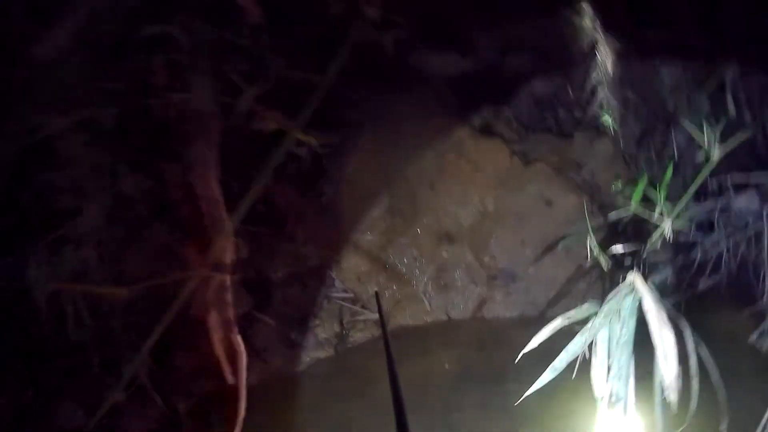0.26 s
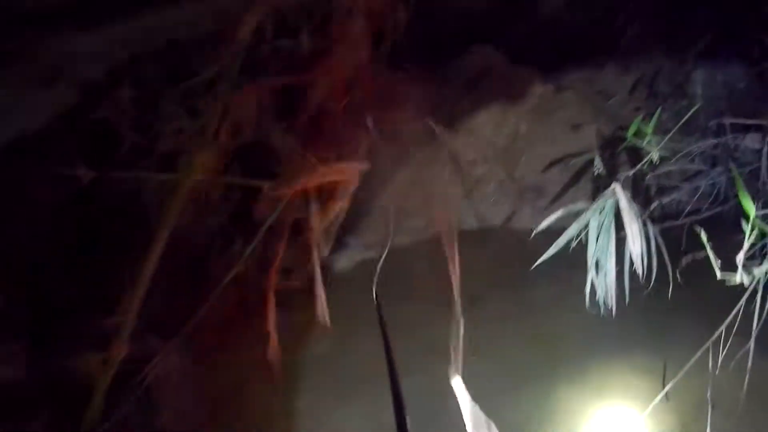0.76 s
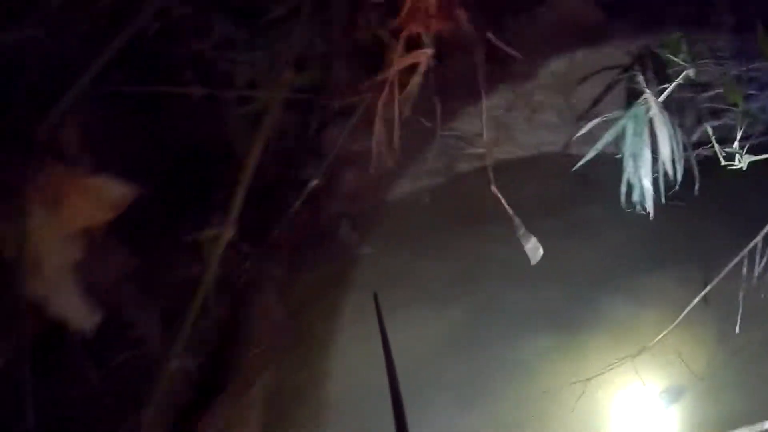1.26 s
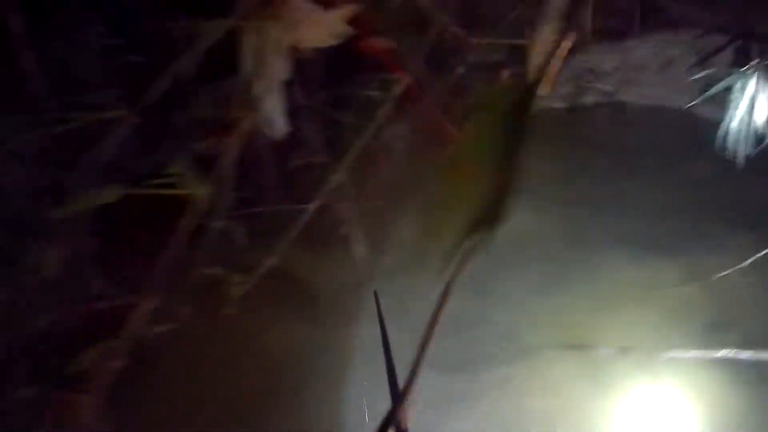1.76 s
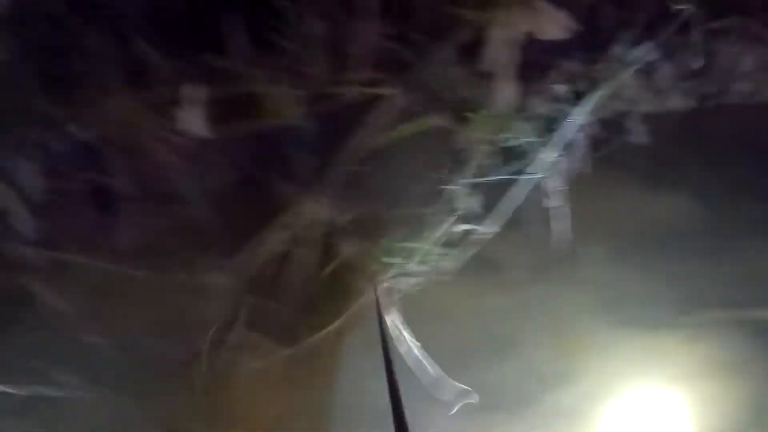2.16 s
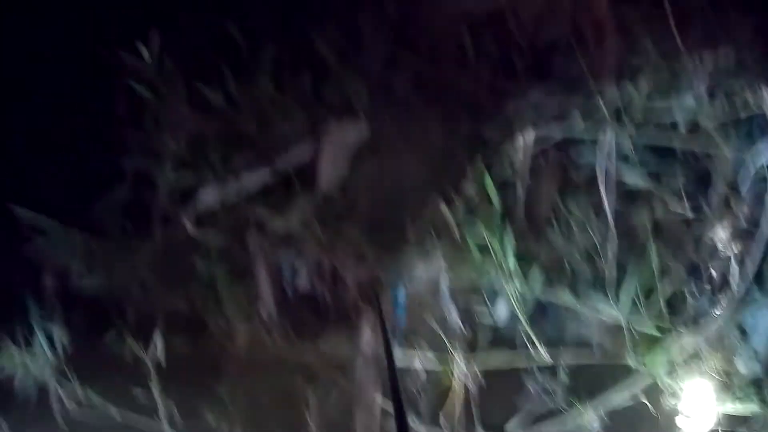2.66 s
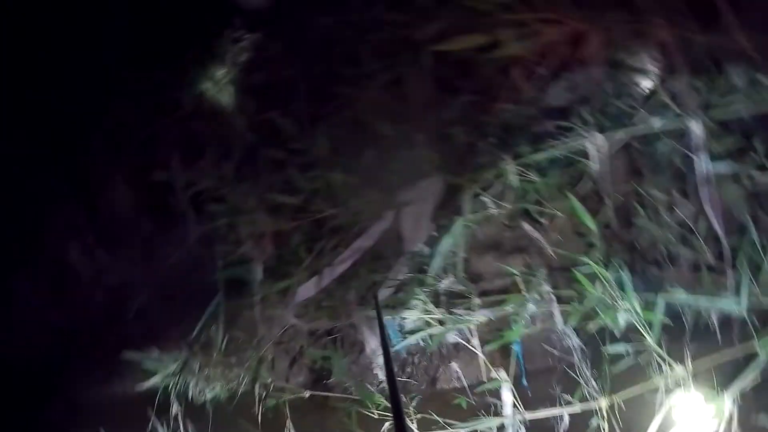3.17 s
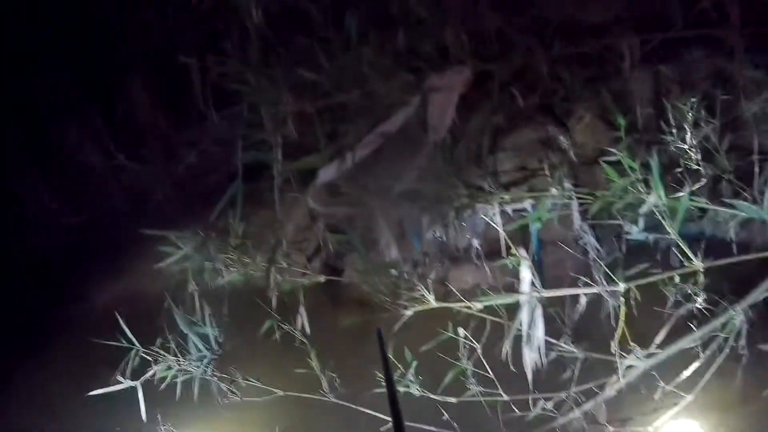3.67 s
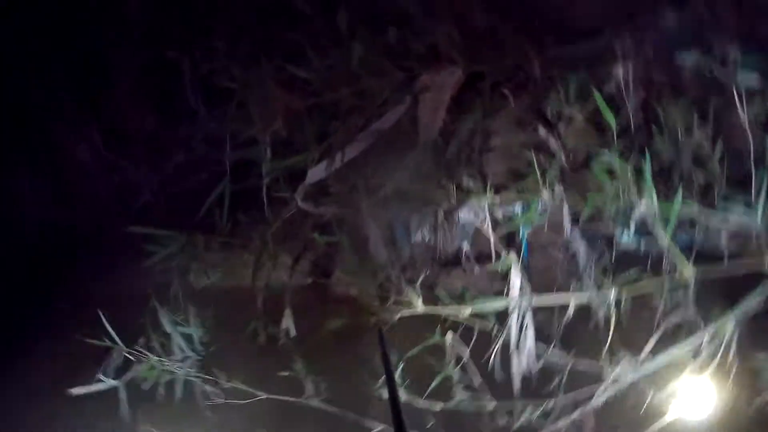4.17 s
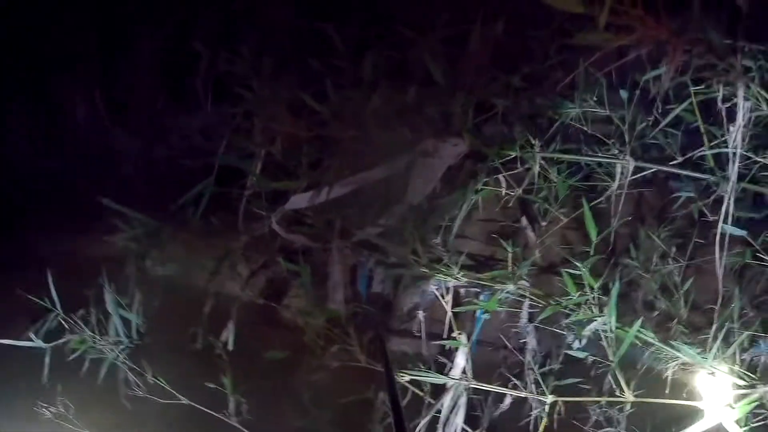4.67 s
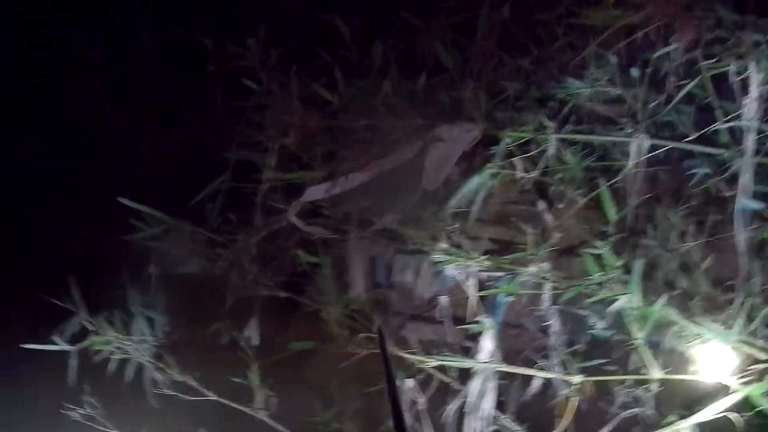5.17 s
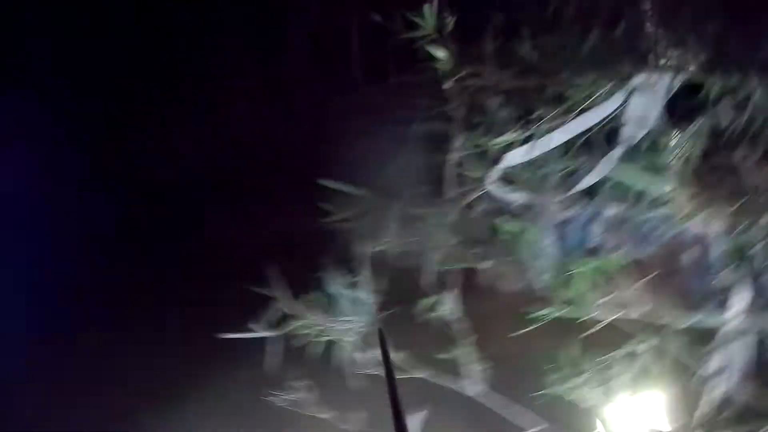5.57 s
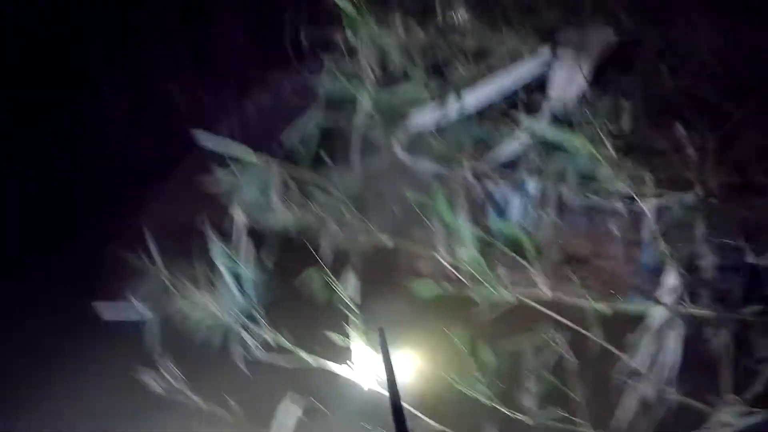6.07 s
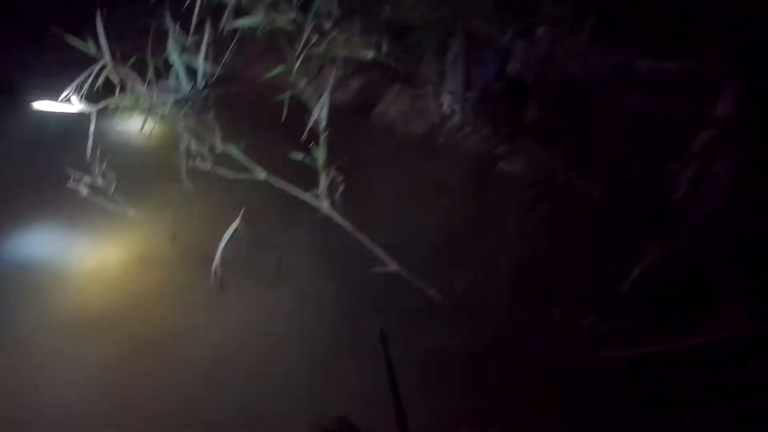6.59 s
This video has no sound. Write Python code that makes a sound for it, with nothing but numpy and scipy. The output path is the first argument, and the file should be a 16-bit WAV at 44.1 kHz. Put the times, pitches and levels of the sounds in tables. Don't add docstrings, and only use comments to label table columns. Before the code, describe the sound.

Someone wades along an overgrown bank, stems scraping and twigs snapping and thudding on a hard hollow shell, with water plops and faint insects.

```python
import sys
import numpy as np
from scipy import signal
from scipy.fft import rfft, irfft
from scipy.io import wavfile
from scipy.ndimage import uniform_filter1d

SR = 44100
rng = np.random.default_rng(int(sys.argv[2]) if len(sys.argv) > 2 else 0)


def int16_out(signal):
    q = np.round(np.clip(np.atleast_2d(signal).T, -1, 1) * 32767)
    wavfile.write(sys.argv[1], SR, q.astype(np.int16))


def ratio(d):
    e = np.asarray(d, float) / 20
    return 10 ** e


N = 301350


def evened(x):
    return x / np.sqrt(np.mean(x ** 2) + 1e-20)


def curve(rows):
    t_s, value = np.transpose(rows)
    return np.interp(np.arange(N) / SR, t_s, value)


def add(mix, t_s, sound):
    part = mix[round(t_s * SR):][:len(sound)]
    part += sound[:len(part)]


def louder(*levels_db):
    return 10 * np.log10(sum(ratio(db) ** 2 for db in levels_db))


def strokes(start_s, length_s, level_db, in_db_s, out_db_s):
    t_s = np.arange(0, N / SR + .01, .002)[:, None]
    before_s = np.maximum(start_s - t_s, 0)
    after_s = np.maximum(t_s - start_s - length_s, 0)
    each_db = level_db - in_db_s * before_s - out_db_s * after_s
    total_db = 10 * np.log10((ratio(each_db) ** 2).sum(1) + 1e-12)
    return np.interp(np.arange(N) / SR, t_s[:, 0], total_db)


def flicker(seconds):
    size = max(int(seconds * SR), 1)
    return evened(uniform_filter1d(uniform_filter1d(rng.standard_normal(N), size), size))


def coloured(points):
    f_hz, db = np.transpose(points)
    hz = np.fft.rfftfreq(N, 1 / SR)
    shape = ratio(np.interp(np.log(hz + 1), np.log(f_hz), db))
    return evened(irfft(rfft(rng.standard_normal(N)) * shape, N))


def slips(per_s, spread_db, clump_db):
    clicks = (rng.random(N) < per_s / SR) * rng.standard_normal(N)
    clicks = clicks * ratio(spread_db * np.minimum(rng.exponential(1, N), 4))
    return clicks * ratio(clump_db * flicker(0.016))


def ring(x, modes):
    out = 0
    for k, (hz, width_hz, db) in enumerate(modes):
        peak = signal.iirpeak(hz, hz / width_hz, SR)
        out = out + (-1) ** k * ratio(db) * signal.lfilter(*peak, x)
    return out


def housing(x, modes, uneven_db):
    touched = [(hz, width_hz, db + u) for (hz, width_hz, db), u in zip(modes, uneven_db)]
    top_hz = min(0.94 * modes[-1][0], 12800)
    wall = signal.butter(4, top_hz, fs=SR, output="sos")
    return signal.sosfilt(wall, ring(x, touched))


def ping(db, hz, cycles, glide):
    turns = np.arange(8000) * hz / SR
    shape = (1 - np.exp(-turns / 0.46)) * np.exp(-turns / cycles)
    tone = np.sin(2 * np.pi * turns * (1 + glide * np.tanh(turns / 16.0)))
    return ratio(db) * shape / shape.max() * tone


# t/s, length/s, drag level/dB, shell ring above drag/dB
DRAG_STROKES = [(0.0, 0.51, -32.5, -12), (0.547, 0.07, -20.5, -24), (0.801, 0.011, -25, -34),
                (0.905, 0.1, -30, -1), (1.127, 0.052, -21, -4), (1.303, 0.11, -24, -6.5),
                (1.507, 0.1, -21, -14), (1.717, 0.072, -28.5, -7.5), (1.835, 0.19, -28.5, -18),
                (2.092, 0.049, -21, -23), (2.255, 0.11, -25, -9.5), (2.391, 0.11, -26.5, -15),
                (2.653, 0.059, -26.5, -10), (2.757, 0.053, -28.5, -7.5), (2.884, 0.12, -29, -10),
                (3.049, 0.15, -28.5, -6), (3.185, 0.39, -31.5, 1), (3.625, 0.089, -32, -1.5),
                (3.78, 0.007, -22.5, -9.5), (3.834, 0.063, -26.5, -10), (4.017, 0.071, -35.5, -8),
                (4.389, 0.11, -37, -20), (4.584, 0.057, -34.5, -13), (4.662, 0.043, -30.5, -16),
                (4.746, 0.055, -32, -15), (4.85, 0.19, -49, -3), (5.173, 0.071, -41.5, -17),
                (5.387, 0.13, -31, -30), (5.585, 0.029, -35.5, -4.5), (5.83, 0.091, -40.5, -37),
                (6.096, 0.089, -41.5, -4), (6.499, 0.028, -52, -12.5)]
# t/s, length/s, shell ring level/dB, crackle above ring/dB
LEAF_STROKES = [(0.597, 0.009, -12.5, -8), (1.162, 0.026, -19.5, -34), (1.315, 0.026, -23, -17),
                (1.582, 0.018, -15, -11), (1.841, 0.013, -19, -13), (1.968, 0.034, -23.5, -14.5),
                (2.237, 0.036, -28.5, -11), (2.396, 0.028, -24, -20), (3.11, 0.064, -40, 3),
                (3.224, 0.29, -29.5, -3), (4.654, 0.12, -44, -11), (6.34, 0.07, -42.5, -33),
                (5.46, 0.033, -36, -26)]
REST_DB = [-9, -26.5, -43.5]
# t/s, level/dB
WADING_EFFORT = [(0.0, -41.5), (.6, -38), (.72, -47), (1.44, -41.5), (2.4, -43), (3.0, -38), (4.2, -42),
                 (4.3, -66.5), (4.4, -38.5), (4.68, -40), (4.97, -52), (5.1, -39), (5.32, -48.5),
                 (5.6, -45), (5.76, -37.5), (6.05, -43.5), (6.18, -46), (6.83, -67)]


def contact():
    start_s, length_s, drag_db, ring_db = np.transpose(DRAG_STROKES)
    stem_drag, stem_ring = [strokes(start_s, length_s, db, in_db_s=906.5, out_db_s=325.5)
                            for db in (drag_db, drag_db + ring_db)]
    start_s, length_s, ring_db, crackle_db = np.transpose(LEAF_STROKES)
    leaf_ring, leaf_crackle = [strokes(start_s, length_s, db, in_db_s=1095.5, out_db_s=706)
                               for db in (ring_db, ring_db + crackle_db)]
    rest = [curve(WADING_EFFORT) + db for db in REST_DB]
    return (louder(stem_drag, rest[0]), louder(stem_ring, leaf_ring, rest[1]),
            louder(stem_ring - 12, leaf_crackle, rest[2]))


# f/Hz, width/Hz, level/dB
BODY_MODES = [(194, 82, 0), (293, 114, 0), (398, 60, 0.5), (693, 140, -9.5), (767, 120, -8),
              (1300, 170, -18)]
# f/Hz, width/Hz, level/dB
SHELL_MODES = [(1194, 180, 6), (1620, 74, 3.5), (1990, 270, 4), (2858, 246, 2.5), (3414, 190, -1)]
# f/Hz, width/Hz, level/dB
TICK_MODES = [(4122, 323, 10.5), (5560, 420, -6.5), (6300, 210, -11.5), (8800, 14000, -9.5),
              (9700, 3400, -7.5)]


def rubbing(drag_db, shell_db, crackle_db):
    clump = ratio(0.62 * flicker(0.0099))
    contact_db = [2.15 * flicker(0.037) for _ in BODY_MODES]
    coarse = clump * slips(per_s=1200, spread_db=1.5, clump_db=2.0)
    fine = clump * slips(per_s=5000, spread_db=2.5, clump_db=1.45)
    dry_leaves = clump * slips(per_s=250, spread_db=-1.0, clump_db=-1.0)
    body = evened(housing(coarse, BODY_MODES, contact_db))
    shell = evened(housing(fine + 0.17 * dry_leaves, SHELL_MODES, contact_db[::-1]))
    crackle = evened(housing(fine + 0.99 * dry_leaves, TICK_MODES, contact_db))
    return ratio(drag_db - 4.5) * body + ratio(shell_db - 13.5) * shell + ratio(crackle_db - 17.5) * crackle


# peak t/s, body level/dB, shell level/dB, tick level/dB, fall/ms
TWIG_SNAPS = [(0.126, -10.5, -7.5, -33, 1.6), (0.544, -30.5, -26, -60, 0.46),
              (0.817, -10.5, -13, -32.5, 2.1), (1.525, -35.5, 4, -4.5, 2.4), (1.607, -5.5, -8.5, -18, 7.4),
              (1.635, -45, -26.5, -19, 0.79), (1.689, -54, -23.5, -29.5, 1.9),
              (1.721, -13.5, -13, -33, 2.7), (1.987, -15.5, -33, -30, 0.98),
              (2.057, -22.5, -21.5, -55, 2.2), (2.109, -1, -6, -14, 3.7), (2.316, -8, -12, -23.5, 1.5),
              (2.413, -26, -15, -28.5, 1.5), (2.504, -11.5, -13.5, -26, 2.76), (2.516, -9.5, -27, -47, 4.7),
              (2.687, 1.5, -8.5, -37, 0.41), (3.05, -1, -16, -37, 0.55), (3.073, -16.5, -18.5, -30, 6),
              (3.667, -33, -20, -39, 2.5), (3.776, -8, -5.5, -18.5, 2.7), (3.804, -18, -22.5, -51.5, 1.6),
              (3.833, -6, -1, -14.5, 5.1), (4.14, -13.5, -24, -38, 8.6), (5.52, -24.5, -30, -44.5, 1.3)]
# peak t/s, body level/dB, shell level/dB
STEM_BUMPS = [(0.264, -19, -62), (0.395, -23, -51), (1.194, 1, -13), (1.326, -18.5, -48),
              (1.367, -11.5, -26), (1.889, -14.5, -15.5), (1.939, -24.5, -20.5), (2.015, -12.5, -21.5),
              (2.716, -18.5, -38), (2.814, -21.5, -48), (3.185, -22.5, -47), (3.552, -12.5, -23.5),
              (3.924, -23.5, -39.5), (4.433, -23.5, -40), (4.769, -22, -36), (4.85, -15.5, -43.5),
              (5.035, -28, -63), (2.147, -26, -39), (2.449, -33, -30.5), (3.77, -0.5, -14.5),
              (6.318, -39.5, -76), (0.767, -29.5, -32), (1.269, -27, -38), (6.127, -25, -71),
              (6.063, -31, -45.5), (6.635, -40, -49.5)]
# peak t/s, body level/dB, shell level/dB, rise/ms, fall/ms
SCUFF_BLOWS = [(0.228, -17.5, -28.5, 19, 2.6), (.326, -28.5, -38.5, 3.7, 37), (0.466, -15, -31, 5.3, 20),
               (0.592, -14.5, -13, 5.4, 6.3), (0.805, -5.5, -18, 6.7, 4.5), (1.127, -25, -38, 5.8, 10),
               (2.92, -19.5, -48.5, 7.1, 4.1), (3.237, -13, -27, 7.9, 33), (3.321, -11, -24, 25, 4.3),
               (3.445, -13.5, -20.5, 9.6, 1.3), (3.484, -16, -29, 2.7, 11), (3.618, -15, -31, 2.4, 4),
               (4.11, -20.5, -47.5, 31, 2.4), (4.157, -15.5, -34.5, 9.2, 0.37),
               (4.519, -25, -38.5, 16, 0.96), (5.215, -18.5, -68.5, 2.2, 8.3),
               (5.388, -21.5, -42, 0.92, 10), (5.457, -16.5, -45, 2.5, 8.4),
               (5.622, -12.5, -34.5, 5.1, 5.6), (5.863, -18.5, -38.5, 6.4, 5.5),
               (6.539, -36.5, -46, 14, 46)]


def blows():
    snaps = [(*row, 0.41 + 0.051 * fall_ms, fall_ms) for *row, fall_ms in TWIG_SNAPS]
    bumps = [(t_s, body, shell, shell - 19, 1, 4.07) for t_s, body, shell in STEM_BUMPS]
    scuffs = [(t_s, body, shell, shell - 16.5, *shape) for t_s, body, shell, *shape in SCUFF_BLOWS]
    return snaps + scuffs + bumps


LEAD = 2000
DULL_TILT, DULL_FROM_DB = 0.38, -18
# f/Hz, width/Hz, level/dB
THUD_MODES = [(258, 186, 1), (418.5, 136, 3.5), (625, 268, -2), (1225, 71, -10)]


def knock(body_db, shell_db, tick_db, rise_ms, fall_ms, rattle):
    ms = (np.arange(len(rattle)) - LEAD) / SR * 1000
    rise_db = 7.4 * ms / max(rise_ms, .2)
    fall_db = -11.0 * ms / max(fall_ms, .3)
    shape = ratio(np.where(ms < 0, rise_db, fall_db))
    push = -3.0 * np.exp(-(rise_ms + fall_ms) / 3.0 - (ms / 0.24) ** 2)
    tilt_db = DULL_TILT * min(shell_db - body_db - DULL_FROM_DB, 0)
    groups = (THUD_MODES, body_db, tilt_db), (SHELL_MODES, shell_db, 0), (TICK_MODES, tick_db, 0)
    out = 0
    for modes, level_db, step_db in groups:
        uneven_db = 1.1 * rattle[:len(modes)] + step_db * np.arange(len(modes))
        sound = housing(shape * rattle + push, modes, uneven_db)
        out = out + ratio(level_db - 1.5) * sound / abs(sound).max()
    return out * signal.windows.tukey(len(out), .3)


# f/Hz, width/Hz, level/dB
MOUNT_RINGS = [(210, 6.9, -15.5), (393, 19, -20.5)]


def knocking():
    out = np.zeros(N)
    for t_s, *row in blows():
        add(out, t_s - LEAD / SR, knock(*row, rng.standard_normal(5000)))
    return out + 4.3 * ring(out, MOUNT_RINGS)


# t/s, length/s, level/dB
MOUNT_JOLTS = [(0.21, 0.027, -33), (0.33, 0.0074, -35), (0.53, 0.067, -31.5), (0.614, 0.018, -27.5),
               (0.813, 0.024, -30), (0.957, 0.048, -26), (1.182, 0.034, -32), (1.317, 0.055, -33.5),
               (1.602, 0.047, -33.5), (1.74, 0.037, -33), (1.905, 0.0071, -32), (2.028, 0.038, -35.5),
               (2.128, 0.051, -35), (2.294, 0.32, -40), (2.496, 0.012, -30), (2.745, 0.11, -33.5),
               (3.06, 0.1, -31.5), (3.238, 0.011, -30), (3.32, 0.076, -31.5), (3.542, 0.016, -31),
               (3.63, 0.075, -35), (3.763, 0.011, -24.5), (3.921, 0.0065, -29), (4.148, 0.0035, -25),
               (4.702, 0.0071, -32), (4.883, 0.011, -40), (5.463, 0.0055, -19.5), (5.866, 0.0074, -34)]
# f/Hz, level/dB
SHAKE_SPECTRUM = [(15, 9.5), (30, 8.5), (50, 24), (110, 22.5), (160, 3.5), (250, -49.5)]
MOUNT_HZ, MOUNT_WIDTH_HZ = 77.2, 23.4


def mount():
    jolts_db = strokes(*np.transpose(MOUNT_JOLTS), in_db_s=606.5, out_db_s=347)
    sway_db = louder(curve(WADING_EFFORT), jolts_db)
    hz = MOUNT_HZ + 0.3233 * MOUNT_WIDTH_HZ * flicker(0.0279)
    swing = np.sqrt(2) * np.sin(2 * np.pi * np.cumsum(hz) / SR) * ratio(3.03 * flicker(0.025))
    return ratio(sway_db) * (swing + ratio(-1.5) * coloured(SHAKE_SPECTRUM))


# t/s,
# peak level/dB, f/Hz, decay/cycles
PART_RINGS = [(.802, -15, 342, 4.6), (.815, -14, 2450, 4.7), (0.464, -25, 1183, 7.9), (0.328, -26, 1110, 3),
              (1.605, -9.5, 800, 4.2), (2.108, -10.5, 3100, 3.6), (2.389, -28, 2200, 3.2),
              (3.768, -10, 374, 1.9), (3.833, -5, 379, 1.9), (4.15, -26.5, 2520, 5),
              (4.788, -28.5, 228, 1.9), (4.975, -39, 292, 5.5), (4.147, -12.5, 76, 1.5),
              (5.512, -10.5, 74.8, 1.1), (5.863, -22.5, 80.6, 1.9), (.813, -17, 760, 3.7),
              (3.772, -16, 1236, 2.1), (3.833, -14.5, 1230, 3.02), (4.691, -35.5, 1100, 4.3),
              (4.766, -31.5, 1115, 5.7), (4.76, -28.5, 557, 4.3), (5.615, -15.5, 233.4, 2.36),
              (5.62, -15.5, 602, 2.6), (5.872, -28, 196.2, 11.7), (6.124, -37.5, 205.4, 9.7),
              (6.31, -46.5, 207, 8.6)]


def loose_parts():
    out = np.zeros(N)
    for t_s, *row in PART_RINGS:
        add(out, t_s, ping(*row, glide=0))
    return out


# t/s, peak level/dB, f/Hz, tick under ring/dB
STEM_CRACKLES = [(0.2098, -26.5, 1990, -20), (0.3398, -28, 1960, -19), (0.5882, -11, 1850, -39.5),
                 (0.6004, -10, 2340, -42), (0.6535, -30, 1740, -34), (1.5249, -2.5, 1980, -13),
                 (1.534, -7, 1960, -21), (1.554, -5, 3700, -27.5), (1.575, -18, 2020, -25.5),
                 (1.5886, -10, 2060, -22), (1.5942, -14.5, 2250, -24), (1.6098, -6, 2040, -16),
                 (1.6223, -25, 1860, -27.5), (1.6891, -20.5, 2360, -2), (1.6973, -30, 2340, 1.5),
                 (1.7005, -28, 2100, -6), (1.7192, -17, 2790, -23), (1.7464, -44.5, 1550, -15),
                 (1.7544, -43.5, 1730, -19), (1.8972, -28, 2000, -39), (1.955, -31, 2050, -27),
                 (2.1076, -5.5, 2120, -34), (2.4136, -22, 2010, -42), (2.6863, -18.5, 2240, -19),
                 (3.0736, -21, 1990, -25.5), (3.1044, -32.5, 2090, -29.5), (3.1572, -26, 2020, -30),
                 (3.2192, -29, 2100, -39), (3.235, -13.5, 2140, -39), (3.296, -17, 1620, -32.5),
                 (3.41, -19.5, 2300, -39), (3.4363, -23, 2270, -37), (3.5495, -29, 2260, -36),
                 (3.579, -31, 2610, -28.5), (3.632, -33, 1940, -17), (3.7131, -45.5, 2760, -27.5),
                 (3.7724, -11.5, 1940, -14), (3.7875, -20, 2620, -42.5), (3.8331, -7, 2575, -32),
                 (3.8551, -45, 1990, -33.5), (3.8697, -42.5, 1620, -32), (4.141, -16, 2220, -25),
                 (5.451, -26, 2200, -27), (5.857, -29, 2010, -24), (5.528, -38, 3040, -11),
                 (5.512, -41, 2480, -8), (5.627, -42, 2480, -9), (5.637, -41.5, 2480, -10),
                 (4.761, -37, 2600, -5), (2.038, -47, 3900, -3), (3.4405, -29.5, 4020, -26),
                 (3.3667, -25, 4050, -27)]


def crackles():
    out, ms = np.zeros(N), np.arange(600) / SR * 1000
    for t_s, db, hz, tick_db in STEM_CRACKLES:
        add(out, t_s, ping(db - 6.5, hz, cycles=4.4, glide=0))
        tick = ring(rng.standard_normal(600), [(5600, 7000, 6.0)]) * np.exp(-ms / 1.1)
        add(out, t_s, ratio(db + tick_db - 2.0) * tick)
    return out


def gliding(x, modes, bend):
    out, turns = 0, np.cumsum(bend) / SR
    for k, (hz, width_hz, db) in enumerate(modes):
        turn = np.exp(2j * np.pi * hz * turns)
        r = np.exp(-np.pi * width_hz / SR)
        smooth = signal.lfilter([1 - r], [1, -r], x / turn)
        out = out + (-1) ** k * ratio(db) * (turn * smooth).real
    return out


# t/s, length/s, level/dB, bright edge relative level/dB
BLADE_SLIDES = [(0.595, 0.01, -34, -19.5), (1.16, 0.0098, -37, -16.5), (1.542, 0.017, -34, -0.5),
                (1.576, 0.039, -32, 0.5), (1.851, 0.06, -42.5, -14.5), (2.224, 0.04, -44.5, -13.5),
                (3.113, 0.0052, -39, -12), (3.158, 0.023, -42.5, -16), (3.222, 0.037, -44.5, -15.5),
                (3.291, 0.048, -34.5, -20), (3.359, 0.05, -34.5, -17.5), (3.429, 0.046, -39, -15),
                (3.52, 0.026, -40, -13.5)]
# f/Hz, width/Hz, level/dB
BLADE_MODES = [(1170, 180, 3), (1700, 40, 7.5), (2200, 120, 1.5), (2920, 270, 0)]
# f/Hz, width/Hz, level/dB
EDGE_MODES = [(3750, 210, 4.5), (5580, 330, -5.5), (6700, 830, -14.5), (8000, 590, -13), (9200, 700, -18)]
# t/s, pitch factor
BLADE_BEND = [
    (3.22, 1.0),
    (3.3, .94),
    (3.45, 1.07),
    (3.55, 1.0),
]


def sliding():
    start_s, length_s, db, edge_db = np.transpose(BLADE_SLIDES)
    grain = slips(per_s=7700, spread_db=2.0, clump_db=2.3)
    bend, out = curve(BLADE_BEND), 0
    for modes, level_db in (BLADE_MODES, db), (EDGE_MODES, db + edge_db):
        stroke_db = strokes(start_s, length_s, level_db, in_db_s=698, out_db_s=605.5)
        out = out + ratio(stroke_db) * evened(gliding(grain, modes, bend))
    return out


# t/s, peak level/dB, f/Hz
HOUSING_TAPS = [(0.18, -22, 727), (0.206, -21, 320), (0.231, -18, 248), (0.264, -20, 377), (0.313, -21, 980),
                (0.327, -23, 258), (0.394, -19.5, 328), (0.462, -27, 336), (0.489, -16, 424),
                (0.981, -33, 263), (1.065, -28.5, 706), (1.193, -4.5, 293), (1.321, -18, 686),
                (1.511, -21, 1280), (2.715, -16, 657), (2.811, -16, 242), (2.887, -23, 393),
                (2.917, -12, 374), (2.934, -24, 404), (2.991, -19, 400), (3.155, -12.5, 710),
                (3.181, -12.5, 694), (3.392, -12.5, 410), (3.436, -14.5, 370), (3.466, -18, 615),
                (3.484, -9, 610), (3.549, -16.5, 422), (3.616, -11, 425), (4.431, -15.5, 280),
                (4.699, -33, 255), (4.769, -26, 257), (4.846, -14, 283), (5.214, -17, 353),
                (5.394, -17, 394), (5.45, -30, 314), (5.479, -22, 350), (5.941, -26, 250)]


def taps():
    out = np.zeros(N)
    for t_s, db, hz in HOUSING_TAPS:
        add(out, t_s, ping(db - 8.5, hz, cycles=3.25, glide=0.054))
    return out


def drip(db, hz, end_hz, seconds):
    size = int(seconds * SR)
    pitch_hz = np.linspace(hz, end_hz, size) * (1 + 0.16 * rng.standard_normal(size))
    return ratio(db) * np.sin(2 * np.pi * np.cumsum(pitch_hz) / SR) * np.hanning(size)


# t/s, level/dB, f/Hz, end f/Hz, length/s
DRIP_EVENTS = [(4.826, -40, 5800, 5900, .006), (5.203, -52, 3900, 4000, .008), (4.02, -52, 3050, 3250, .04),
               (4.05, -52, 3250, 2850, .06), (.362, -40, 1550, 1400, .035), (.534, -27, 950, 1100, .014),
               (.308, -35, 1000, 1080, .012), (6.195, -45, 1100, 1220, .03), (6.2, -52, 1900, 2300, .02),
               (6.375, -54, 1700, 2200, .012), (1.6315, -12, 1950, 2000, .008),
               (3.834, -12, 2700, 2600, .012), (5.445, -44, 2250, 2300, .016),
               (5.616, -24, 1150, 1150, .014), (5.875, -38, 410, 400, .06), (6.405, -54, 1500, 2400, .012)]


def drips():
    out = np.zeros(N)
    for t_s, *row in DRIP_EVENTS:
        add(out, t_s, drip(*row))
    return out


def gurgle(drag_db):
    out = np.zeros(N)
    for hz in np.geomspace(450, 2600, num=14):
        t_s = np.arange(int(7.5 * SR / hz)) / SR
        rising = np.sin(2 * np.pi * hz * t_s * (1 + 0.079 * t_s / t_s[-1]))
        bubble = rising * np.hanning(len(t_s)) * (450 / hz) ** 1.3
        out += signal.oaconvolve(slips(per_s=16, spread_db=1.0, clump_db=-0.5), bubble)[:N]
    return ratio(drag_db - 13.0) * evened(out)


# t/s, level/dB
AIR_GAIN = [(0.0, -61), (.55, -58), (1.45, -64), (1.62, -47.5), (1.8, -70.5), (2.3, -71), (3.03, -63.5),
            (3.3, -65.5), (3.45, -78), (4.08, -67.5), (4.2, -79), (4.3, -64), (4.6, -57), (5.5, -59.5),
            (5.56, -68.5), (5.69, -74.5), (5.78, -56.5), (6.83, -61.5)]
DUCK_FROM_DB, DUCK_SHARE, DUCK_BACK_DB_S, DUCK_LATE_S = -16.5, 0.97, 81, 0.02
OPEN_DB, OPEN_SHARE = -70.5, 0.52


def ducking(near):
    back_db = np.arange(N) * DUCK_BACK_DB_S / SR
    level_db = 10 * np.log10(abs(uniform_filter1d(near ** 2, size=60)) + 1e-12)
    level_db = level_db + OPEN_SHARE * (curve(AIR_GAIN) - OPEN_DB)
    held_db = np.maximum.accumulate(level_db + back_db) - back_db
    over_db = np.maximum(held_db - DUCK_FROM_DB, 0)
    late_db = np.roll(uniform_filter1d(over_db, size=400), round(DUCK_LATE_S * SR))
    return ratio(-DUCK_SHARE * late_db)


# f/Hz, level/dB (per Hz)
AIR_SPECTRUM = [(59, 4), (100, -38.5), (156, -55), (294, -14), (615, -23), (1180, -16.5), (3950, -23.5),
                (4680, -20.5), (5540, -25.5), (6990, -21.5), (9800, -24), (12100, -21), (15600, -27.5)]
# f/Hz, width/Hz, level/dB
KATYDID_MODES = [(11000, 430, 2), (13100, 1200, -3.5), (13800, 1600, -1)]
RASPS_PER_S, RASP_AT_S, CHIRPS_PER_S, CHIRP_AT_S = 20.40, .0196, 33.32, .0233
CHIRP_HZ, CHIRP_WIDTH_HZ = 11980, 170


def night():
    t_s = np.arange(N) / SR
    rasp = (.5 + .5 * np.cos(2 * np.pi * RASPS_PER_S * (t_s - RASP_AT_S))) ** 0.87
    phase = (CHIRPS_PER_S * (t_s - CHIRP_AT_S) + .5) % 1 - .5
    chirp = np.exp(-phase ** 2 / 0.035)
    wings = rng.standard_normal(N)
    katydid = evened(sum(ring(ring(wings, [mode]), [mode]) for mode in KATYDID_MODES) * rasp)
    tone = ring(rng.standard_normal(N), [(CHIRP_HZ, CHIRP_WIDTH_HZ, 0)])
    cricket = evened(tone * chirp * ratio(2.0 * flicker(.3)))
    air = coloured(AIR_SPECTRUM) * ratio(0.24 * flicker(0.035))
    return ratio(curve(AIR_GAIN)) * (ratio(6.0) * air + ratio(-5.5) * katydid + ratio(-5.5) * cricket)


def scene():
    drag_db, shell_db, crackle_db = contact()
    rub = rubbing(drag_db, shell_db, crackle_db)
    hits = knocking() + mount() + loose_parts() + crackles() + taps() + drips()
    duck = ducking(hits + rub)
    close = duck ** 0.43 * (rub + gurgle(drag_db))
    return (hits + close + sliding() + duck * night())[None]


def band_limit(x):
    return signal.sosfilt(signal.butter(12, 15750, fs=SR, output="sos"), x)


def record(dry):
    fall_db = np.arange(N) * 170.0 / SR
    level_db = 20 * np.log10(abs(dry) + 1e-6)
    held_db = np.maximum.accumulate(level_db + fall_db, axis=1) - fall_db
    over_db = np.maximum(held_db + 4.0, 0)
    late_db = np.roll(uniform_filter1d(over_db, 60), 90, axis=1)
    capped = np.clip(dry * ratio(-.7 * late_db), -.66, .66)
    top = signal.sosfiltfilt(signal.butter(24, 12900, "high", fs=SR, output="sos"), capped)
    sudden = uniform_filter1d(top ** 2, 300) > 10 * uniform_filter1d(top ** 2, 6000) / 4
    lost = np.minimum(4 * uniform_filter1d(1. * sudden, 600), 1)
    return band_limit(capped - lost * top)


dry = scene()
out = record(dry)
int16_out(out)
```